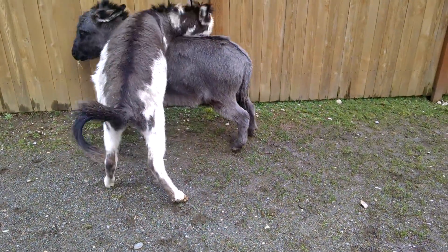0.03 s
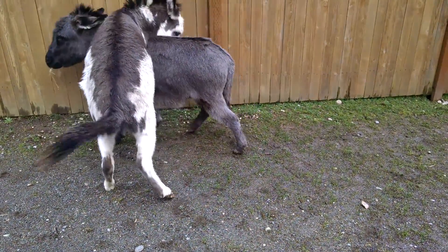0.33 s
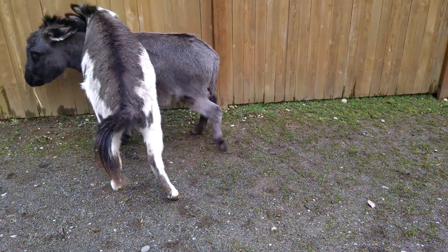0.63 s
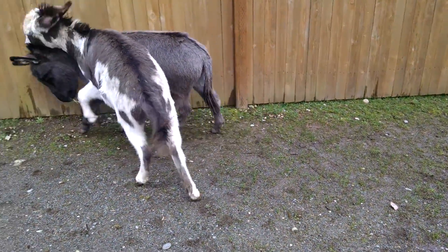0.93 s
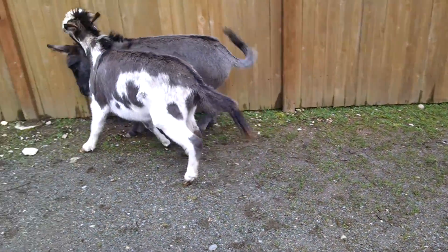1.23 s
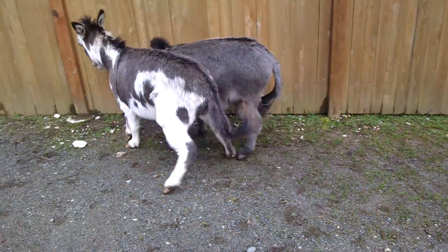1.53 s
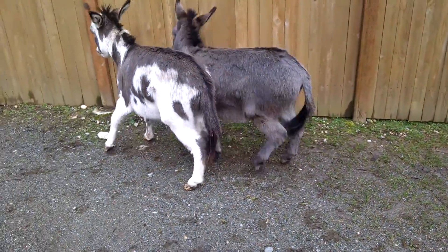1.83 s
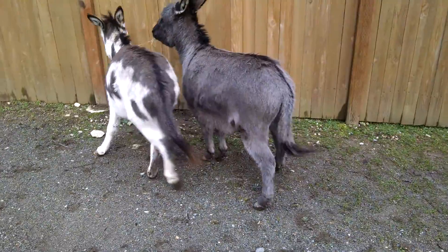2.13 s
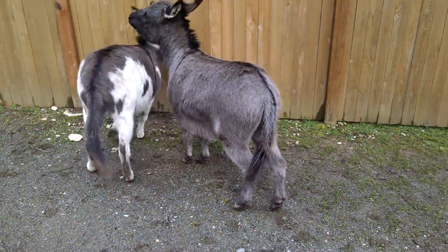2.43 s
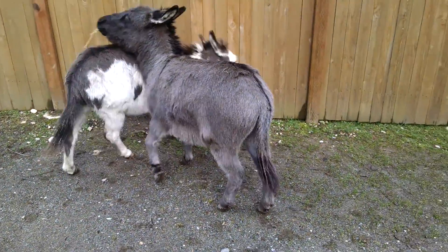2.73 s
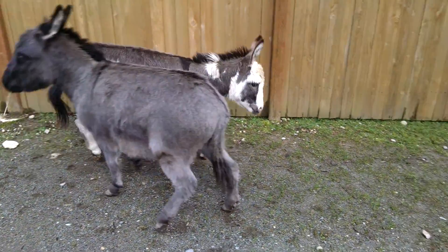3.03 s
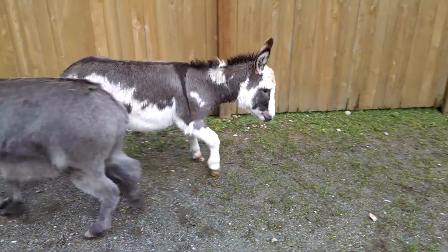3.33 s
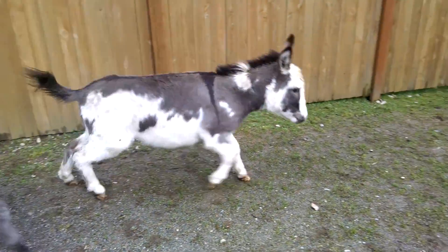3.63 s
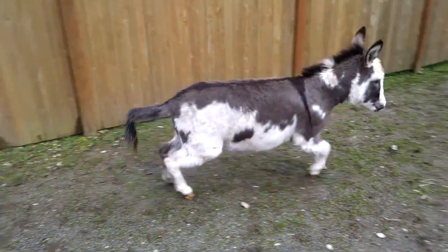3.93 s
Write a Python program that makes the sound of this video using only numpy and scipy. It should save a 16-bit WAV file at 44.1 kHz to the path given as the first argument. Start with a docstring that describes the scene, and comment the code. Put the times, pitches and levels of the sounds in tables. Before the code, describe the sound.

Donkey hooves scuff irregularly on fine gravel outdoors, with pebbles clicking and loose grit rustling between steps. A faint hum and tiny squeak pass in the first half second. Scattered scrapes lead to louder crunches, knocks and dull thuds around 1.6 to 1.9 seconds. Lighter steps follow, then busier ones from 2.8 to 4 seconds. A steady distant rush and light wind rumble lie underneath.

```python
"""Donkeys on gravel

Two donkeys jostle and walk on damp, fine gravel beside a wooden fence. Hooves scuff the grit, snap
single pebbles, knock, rasp and thud on the packed earth; loose grit rustles between steps. Behind them
sit a steady distant rush and a light wind, with a faint hum and one squeak at the start.
Two closely spaced microphones give the stereo image."""
import sys
import numpy as np
from scipy import signal
from scipy.fft import rfft, irfft, next_fast_len
from scipy.io import wavfile
from scipy.ndimage import map_coordinates

SR = 44100
rng = np.random.default_rng(int(sys.argv[2]) if len(sys.argv) > 2 else 0)


def wav_record(signal):
    """Record a signal, one row per channel, as 16-bit PCM in the file named by sys.argv[1]."""
    frames = np.transpose(np.atleast_2d(signal))
    bounded = np.clip(frames, -1, 1)
    # unit amplitude maps onto the largest positive 16-bit level
    quanta = np.round(bounded * 32767).astype(np.int16)
    wavfile.write(sys.argv[1], SR, quanta)


N = 176400
TOP_HZ = 15600  # ceiling of the grains and of the final mix


def amp(db):
    """Decibels to gain."""
    return 10 ** (np.asarray(db) / 20)


def unit(x):
    """Scale to rms 1."""
    return x / np.sqrt(np.mean(x ** 2) + 1e-20)


def along(points, hz):
    """Read (f, value) breakpoints on a log frequency axis."""
    f, v = np.transpose(points)
    return np.interp(np.log(hz + 1), np.log(f + 1), v)


def curve(rows):
    """Draw (t, value) breakpoints as one value per sample."""
    return np.interp(np.arange(N) / SR, *np.transpose(rows))


def wobble(rate):
    """Smooth random modulation, rate knots a second."""
    return map_coordinates(rng.standard_normal(2048), [np.arange(N) * rate / SR], mode="wrap")


def filtered(x, response):
    """EQ x with a gain given as a function of frequency."""
    n = x.shape[-1]
    m = next_fast_len(n + 2048)
    return irfft(rfft(x, m) * response(np.fft.rfftfreq(m, 1 / SR)), m)[..., :n]


def resonate(x, pitch, width):
    """One broad band-pass; width is a share of the pitch."""
    return filtered(x, lambda hz: 1 / (1 + ((hz / pitch - pitch / (hz + 1)) / width) ** 2))


def noise(eq):
    """Two unrelated channels of noise through an EQ curve, at rms 1."""
    return unit(filtered(rng.standard_normal((2, N)), lambda hz: amp(along(eq, hz))))


def add(out, s, x):
    """Mix x into out from time s."""
    i = int(np.clip(round(s * SR), 0, N - 1))
    out[..., i:i + x.shape[-1]] += x[..., :N - i]


# Tone of the far-off bed: f/Hz, relative level/dB
RUSH_EQ = [(10, -15), (20, -21), (45, 2), (75, 2.5), (130, 0), (270, 0.5), (400, -3.5), (780, 0.5),
           (1100, -6), (1600, -17), (2600, -16.5), (6000, -25), (11000, -23.5), (14500, -21.5)]

def distant_rush(db=-41):
    """A steady, dark bed of noise whose level barely wavers."""
    return noise(RUSH_EQ) * amp(db + 0.75 * wobble(5))


# Tone of the wind rumble: f/Hz, relative level/dB
WIND_EQ = [(20, -2), (50, -6), (75, 6), (170, -6.5), (330, -5.5), (600, -29), (1500, -72), (6000, -83)]
# Fader ride of the gusts: t/s, relative level/dB
WIND_RIDE = [(0, -53), (.6, -58), (1.15, -50.5), (1.32, -49), (1.5, -55), (1.7, -45.5), (1.97, -46),
             (2.2, -53), (3.15, -46.5), (3.4, -42), (3.55, -43), (3.75, -40.5), (4, -51.5)]

def wind(trim_db=1.5):
    """Light wind buffets the microphones with a fluttering rumble."""
    return noise(WIND_EQ) * amp(curve(WIND_RIDE) + trim_db + 2.6 * wobble(25.2))


def hum(hz=123.7, db=-45.5, octave_db=-7, end_s=0.46, fade_s=0.21):
    """A faint low tone and its octave waver and die away."""
    phase = 2 * np.pi * np.cumsum(hz * (1 + 0.013 * wobble(11))) / SR
    fade = np.clip((end_s - np.arange(N) / SR) / fade_s, 0, 1)
    tone = amp(db) * (np.sin(phase) + amp(octave_db) * np.sin(2 * phase)) * fade
    return np.array([np.sqrt(2) * tone, np.zeros(N)])


def grains(ring_s, count, spread_db=0.5):
    """Two unrelated streams of tiny stone contacts, each a brief ping at its own pitch."""
    t = np.arange(80) / SR
    streams = []
    for _ in range(2):
        when, pitch, softness = rng.random((count, 3)).T
        gain = amp(spread_db * np.log(1 - .98 * softness))
        pings = gain[:, None] * np.sin(2 * np.pi * TOP_HZ * pitch[:, None] * t) * np.exp(-t / ring_s)
        at = (when * N).astype(int)[:, None] + np.arange(len(t))
        streams.append(np.bincount(at.ravel() % N, pings.ravel(), N))
    return unit(np.array(streams))


# Tone of crushed grit: f/Hz, relative level/dB
GRIT_EQ = [(150, -14.5), (500, -7.5), (1500, -10.5), (2600, -6), (3700, -4.5), (5200, -7.5), (8000, -5),
           (11500, -5), (13700, 0.5), (15300, -3)]

def grit_colour(hz, tilt_db):
    """Gain of the grit EQ, tilted by tilt_db per 10 kHz toward finer or coarser stones."""
    return amp(along(GRIT_EQ, hz) + tilt_db * np.minimum(hz, TOP_HZ) / 10000)


LOOSE_TILT_DB = 3.5
# Fader ride of loose grit underfoot, for rustle and crackle: t/s, relative level/dB
LOOSE_GRIT_RIDE = [(0, -50), (.12, -50), (.22, -59), (.45, -52), (.62, -59.5), (.72, -47.5), (1.02, -50),
                   (1.2, -50.5), (1.6, -48.5), (1.72, -47.5), (2.02, -46.5), (2.15, -45), (2.28, -50.5),
                   (2.66, -44), (2.78, -45.5), (3.0, -47), (3.18, -56.5), (3.3, -42), (3.5, -45),
                   (3.66, -40.5), (4, -46)]

def rustle(trim_db=1):
    """Loose grit shifts in small clumps between the steps."""
    stream = filtered(grains(ring_s=0.001, count=17000), lambda hz: grit_colour(hz, LOOSE_TILT_DB))
    clumps = amp(0.5 * wobble(33.45) + 1.36 * wobble(220))
    return amp(curve(LOOSE_GRIT_RIDE) + trim_db) * unit(stream * clumps)


def crackle(count=420, trim_db=-2, spread_db=3.8, low_hz=3000, high_hz=15000, ring_s=0.0005):
    """Coarser stones click one by one in the disturbed grit, each with three resonances."""
    out, t = np.zeros((2, N)), np.arange(SR // 200) / SR
    for when, size, *pitches in rng.random((count, 8)):
        hz = low_hz + (high_hz - low_hz) * np.reshape(pitches, (2, 3, 1))
        modes = grit_colour(hz, LOOSE_TILT_DB) * np.sin(2 * np.pi * hz * t)
        click = modes.sum(axis=1) * np.exp(-t / ring_s)
        add(out, when * N / SR, amp(-spread_db * np.log(1 - .93 * size)) * click)
    return amp(curve(LOOSE_GRIT_RIDE) + trim_db) * unit(out)


def squeak(peak_s=0.1, length_s=0.05, pitch_hz=1062, sag_hz_per_s=1210, db=-44, rough=0.072):
    """A faint, rough, fluttering tone that slides down."""
    t = np.arange(N) / SR - peak_s
    hz = (pitch_hz - sag_hz_per_s * t) * (1 + rough * wobble(410))
    envelope = amp(db) * np.exp(-(t / length_s) ** 2) * wobble(160)
    tone = envelope * np.sin(2 * np.pi * np.cumsum(hz) / SR)
    return np.array([np.sqrt(2) * tone, np.zeros(N)])


def crunch(stream, s, rise, fall, db, tilt_db, settle_db, colour_db, settle_s=0.02, colour_hz=446.5):
    """Grains swell as the hoof bears down, fall off and trickle on; gives start time and sound."""
    lead = 2 * rise + .002
    t = np.arange(int((lead + 2 * fall + 4 * settle_s) * SR)) / SR - lead
    swell = np.exp(-(t / np.where(t < 0, rise, fall)) ** 2)
    trickle = (t > 0) * amp(settle_db) * np.exp(-abs(t) / settle_s)
    envelope = np.maximum(swell, trickle)
    stones = rng.standard_normal(128)  # every patch of stones rings a little differently
    ripple = lambda hz: amp(colour_db * map_coordinates(stones, [hz / colour_hz], mode="wrap"))
    patch = stream.take(int((s - lead) * SR) + np.arange(len(t)), axis=1, mode="wrap")
    burst = filtered(envelope * patch, lambda hz: grit_colour(hz, tilt_db) * ripple(hz))
    return s - lead, amp(db) * unit(burst) * np.sqrt(np.mean(envelope ** 2))


# Pebble snap cues: t/s, level/dB, brightness/(dB per 10 kHz)
PEBBLE_SNAPS = [(0.1715, -25, 4), (0.2595, -31, 12), (0.3382, -17.5, 18), (.409, -29, 14),
                (1.6322, -17.5, 10), (2.0852, -24, 12), (2.489, -25, 7), (2.9007, -20, 16),
                (3.2465, -20, 8), (3.3127, -21, 14), (3.559, -21, 8), (3.7168, -18.5, 15), (3.832, -23, 11),
                (.4805, -32, -5), (0.5445, -36, 6), (0.847, -22, 2), (1.095, -27, 9), (1.2905, -27, 3),
                (1.3935, -27, -9), (1.754, -19, 2), (1.802, -24, 6), (1.8325, -23, 3), (2.152, -28, 6),
                (2.1905, -30, 10), (2.249, -31, 7), (2.493, -25, 7), (2.5257, -32.5, -3), (2.55, -27, 12),
                (2.8103, -24.5, -6), (3.0285, -31, 5), (3.044, -24, 5), (3.423, -29, -1), (3.6018, -24, 14),
                (3.665, -28, 6), (3.7995, -25, 12), (3.955, -24, 9)]

def snaps(stream, rise_s=0.0005, fall_s=0.0018):
    """A pebble snaps under a hoof: a tight transient with almost no tail."""
    out = np.zeros((2, N))
    for s, db, tilt_db in PEBBLE_SNAPS:
        add(out, *crunch(stream, s, rise_s, fall_s, db, tilt_db, settle_db=-38, colour_db=2.4))
    return out


# Hoof scuff cues: peak t/s, rise/s, fall/s, level/dB, brightness/(dB per 10 kHz)
HOOF_SCUFFS = [(0.332, 0.034, 0.013, -37.5, 5), (.380, 0.0022, 0.01, -27.5, 5),
               (.400, .01, 0.054, -44.5, 1), (0.48, 0.036, 0.019, -43, -2),
               (0.813, 0.027, 0.014, -37.5, -2), (.845, 0.015, 0.018, -27.5, -0.5),
               (.93, 0.036, 0.03, -41, -2), (1.097, 0.0027, 0.017, -32, 6), (1.292, 0.009, 0.037, -31.5, 0),
               (1.353, 0.0074, 0.034, -39.5, -1), (1.396, .002, 0.0081, -40.5, -11),
               (1.463, 0.0075, 0.0056, -35.5, 2.5), (1.54, 0.023, 0.017, -38.5, 9),
               (1.637, 0.0043, 0.0074, -21, 5), (1.758, 0.0042, 0.011, -22, 2),
               (1.799, 0.025, 0.047, -35, 2), (1.835, 0.0041, 0.0094, -43.5, -5),
               (1.897, 0.013, 0.0091, -31.5, 3), (1.925, 0.016, 0.015, -37.5, 0.5),
               (2.086, 0.0033, .012, -34, 23), (2.15, 0.015, 0.011, -44, -4),
               (2.193, 0.0041, 0.054, -39.5, 15), (2.352, 0.0071, .012, -31, -4),
               (2.489, 0.037, 0.017, -40, 9), (2.55, 0.0033, 0.007, -30, 10.5),
               (2.813, 0.023, 0.017, -43, -11), (2.875, .005, 0.014, -29.5, 19),
               (2.904, 0.0058, 0.017, -34.5, 4.5), (3.046, 0.014, 0.033, -32.5, 3.5),
               (3.108, 0.016, 0.042, -35, 1.5), (3.198, 0.0048, 0.0082, -28, -3),
               (3.249, 0.0039, 0.0073, -25.5, -1.5), (3.314, 0.0027, 0.0063, -24, 10),
               (3.349, .018, 0.0079, -34, 2), (3.389, 0.024, 0.023, -38.5, -3),
               (3.559, 0.0042, 0.0052, -27, 5), (3.575, 0.007, 0.019, -20, 4),
               (3.688, 0.022, 0.0097, -30, 1.5), (3.735, 0.026, 0.055, -29.5, 3.5),
               (3.864, 0.0067, 0.035, -32, 1.5), (3.916, 0.005, 0.016, -34, -2.5),
               (3.968, 0.0095, 0.0061, -25.5, 6.5), (3.986, 0.0081, 0.011, -18, 10)]

def scuffs(stream):
    """A hoof scrapes through the gravel: a crunch with a soft tail of settling grit."""
    out = np.zeros((2, N))
    for cue in HOOF_SCUFFS:
        add(out, *crunch(stream, *cue, settle_db=-17, colour_db=2.1))
    return out


# Dull low hits: hooves landing on earth, except the longer, higher rows near 3.36 and 3.42 s, which are the
# donkeys' coats brushing together: t/s, level/dB, decay/s, starting f/Hz, clean bounce share/0-1
LOW_THUDS = [(1.609, -33, 0.011, 145, .9), (1.654, -29.5, 0.013, 180, .8),
             (1.698, -22.5, 0.0075, 133, 0.74), (1.741, -33, 0.017, 148, 0.54),
             (1.781, -28, 0.01, 165, .85), (1.824, -29, 0.0099, 141, 0.52), (1.894, -35, 0.025, 138, 0.73),
             (1.917, -35, 0.089, 89.7, 0.85), (3.013, -33, 0.014, 249, 0.31),
             (3.038, -28.5, 0.009, 300, 0.83), (3.194, -28.5, 0.01, 202, 0.75),
             (3.246, -27, 0.01, 273, 0.35), (3.255, -25, 0.015, 110, 0.74), (3.317, -30, 0.011, 261, 0.21),
             (3.361, -33, 0.022, 390, 0.35), (3.417, -36, 0.078, 346, 0.82), (3.521, -31, 0.013, 420, .4),
             (3.677, -33.5, 0.029, 350, .5), (3.714, -24.5, 0.03, 213, 0.67),
             (3.737, -28, 0.018, 91, 0.98)]

def thuds(attack_s=0.0024, sag=0.207, sag_s=0.014):
    """The earth takes each hoof with a dull puff and a low bounce that sags as the hoof sinks in; the same dull
    body also gives two soft brushes of the donkeys' coats."""
    out, t = np.zeros((2, N)), np.arange(SR // 4) / SR
    for s, db, decay, pitch, clean in LOW_THUDS:
        envelope = (1 - np.exp(-t / attack_s)) * np.exp(-(t / decay) ** 1.18)
        puff = resonate(rng.standard_normal((2, len(t))), pitch, width=0.81) * envelope
        sagging_hz = pitch * (1 - sag * (1 - np.exp(-t / sag_s)))
        bounce = -np.sin(2 * np.pi * np.cumsum(sagging_hz) / SR) * envelope
        centre = clean * unit(bounce) + np.sqrt(1 - clean ** 2) * unit(puff[0])
        body = np.array([centre, 0.3 * unit(puff[1])])
        add(out, s, amp(db) * body * np.sqrt(np.mean(envelope ** 2)))
    return out


# Hard hits of hoof on stone or hoof: t/s, level/dB, f/Hz, t60/s
HOOF_KNOCKS = [(1.661, -27, 750, 0.041), (1.701, -25.5, 750, 0.038), (1.754, -32, 1080, 0.031),
               (2.803, -18.5, 2070, 0.0083), (3.016, -20.5, 754, 0.0066), (3.196, -21.5, 950, 0.014),
               (3.247, -32, 810, 0.019), (3.682, -19, 595, 0.01), (3.694, -21, 810, 0.033),
               (3.751, -19.5, 690, 0.012)]
# Partials of hoof horn: pitch/ratio, relative level/dB, t60/ratio
HORN_MODES = [(1, -3.5, 1), (1.3, -9, 0.45), (1.85, -23, 0.3)]

def knocks():
    """Hoof horn rings briefly on a hard contact."""
    out, t = np.zeros((2, N)), np.arange(SR // 20) / SR
    for s, db, pitch, t60 in HOOF_KNOCKS:
        for ratio, mode_db, ring_share in HORN_MODES:
            gain = amp(db + mode_db + rng.normal(size=(2, 1)))
            decay = np.exp(-np.log(1000) * t / (t60 * ring_share))
            add(out, s, gain * decay * np.sin(2 * np.pi * pitch * ratio * t))
    return out


# Drags of the hoof wall: peak t/s, half-length/s, level/dB, f/Hz
HOOF_RASPS = [(1.758, 0.011, -37.5, 1370), (1.921, 0.013, -43.5, 1510), (2.876, 0.017, -40, 1740),
              (3.113, 0.0089, -37, 1550), (3.591, 0.0077, -39, 1510), (3.701, 0.01, -37.5, 820),
              (3.769, 0.011, -37.5, 1110)]

def rasps():
    """Grains dragged under a hoof excite its broad resonance."""
    out, t = np.zeros((2, N)), np.arange(SR // 6) / SR - 1 / 12
    for s, half_length, db, pitch in HOOF_RASPS:
        ticks = rng.standard_normal((2, len(t))) ** 3  # cubing makes the noise spiky
        body = unit(resonate(ticks, pitch, width=0.88))
        add(out, s + t[0], amp(db) * body * np.exp(-(t / half_length) ** 2))
    return out


def yard(x, wet_db=-12, t60_s=0.12, build_s=0.0042):
    """The fence and ground answer with a short, weak reverb tail."""
    t = np.arange(SR // 4) / SR
    tail = rng.standard_normal((2, len(t))) * np.exp(-np.log(1000) * t / t60_s)
    tail *= np.minimum(t / build_s, 1)
    return x + amp(wet_db) * signal.fftconvolve(x, tail / np.linalg.norm(tail[0]), axes=1)[:, :N]


# How alike left and right are: f/Hz, likeness/0-1
STEREO_LIKENESS = [(40, .02), (100, 0.35), (700, 0.54), (1400, 0.9), (2600, 1), (5200, 0.83), (7000, 0.6),
                   (9500, 0.64), (14000, 0.69)]
# Sound that reaches the right microphone first: f/Hz, share/0-1
RIGHT_FIRST = [(7000, 0.12), (11000, .95)]

def microphones(pair, comb_hz=2556, notch_sharpness=0.24):
    """A close pair: two signals become left and right, in and out of step with rising frequency."""
    main, diffuse = rfft(pair)
    hz = np.fft.rfftfreq(N, 1 / SR)
    phase = np.maximum(2 * np.pi * hz / comb_hz - np.pi, 0)
    phase -= notch_sharpness * np.sin(phase) * np.exp(-hz / 8000)
    alike = along(STEREO_LIKENESS, hz)
    in_step = alike * np.cos(phase)
    lead = along(RIGHT_FIRST, hz) * alike * np.sin(phase) / np.sqrt(1 - in_step ** 2)
    mid = np.sqrt((1 + in_step) / 2) * main
    side = np.sqrt((1 - in_step) / 2) * (1j * lead * main + np.sqrt(1 - lead ** 2) * diffuse)
    return irfft(np.array([mid - side, mid + side]), N)


def scene():
    """Hoof foley in the yard reverb, over a bed of rush, wind and hum."""
    bed = distant_rush() + wind() + hum()
    grit = grains(ring_s=0.00018, count=20000) * amp(0.59 * wobble(350))
    foley = rustle() + crackle() + squeak() + snaps(grit) + scuffs(grit) + thuds() + knocks() + rasps()
    return microphones(yard(foley) + bed)


def record(dry):
    """A brick-wall low-pass on the whole mix."""
    return filtered(dry, lambda hz: 1 / np.sqrt(1 + (hz / TOP_HZ) ** 160))


dry = scene()
out = record(dry)
wav_record(out)
```